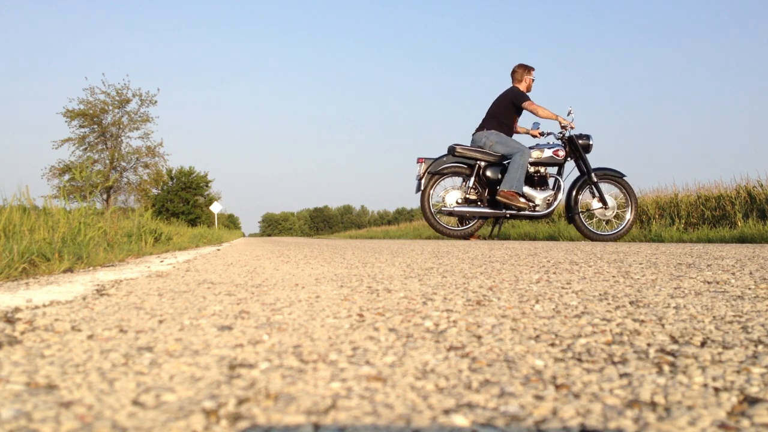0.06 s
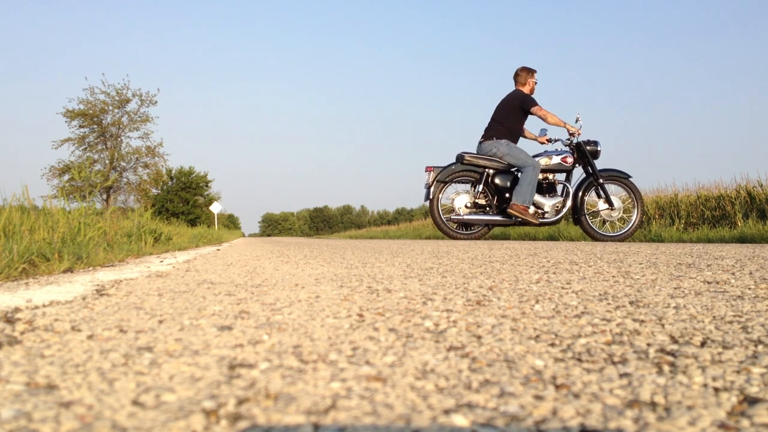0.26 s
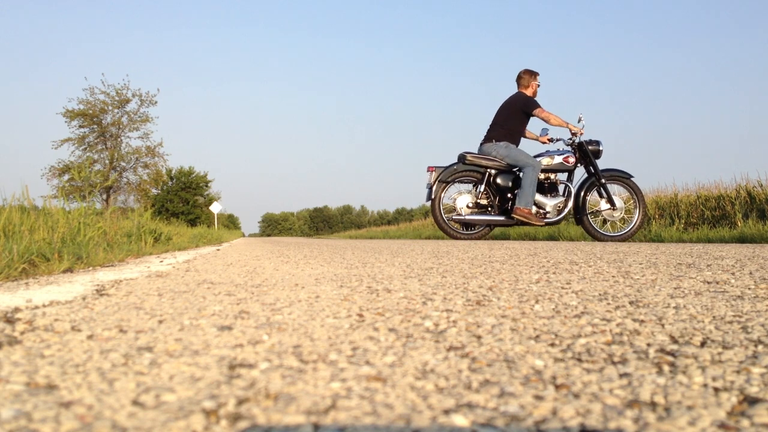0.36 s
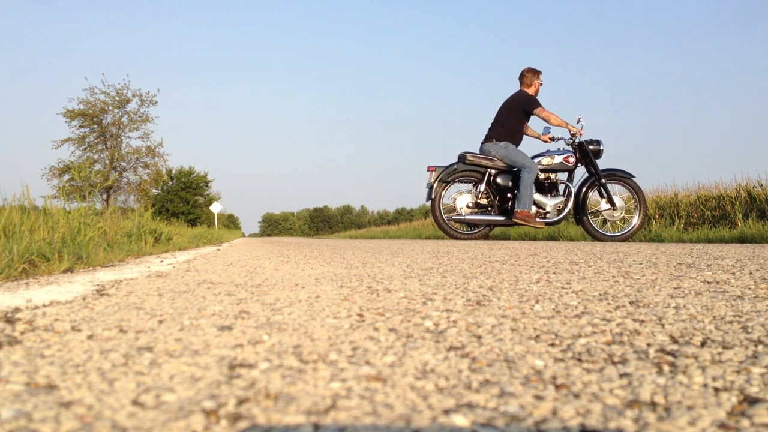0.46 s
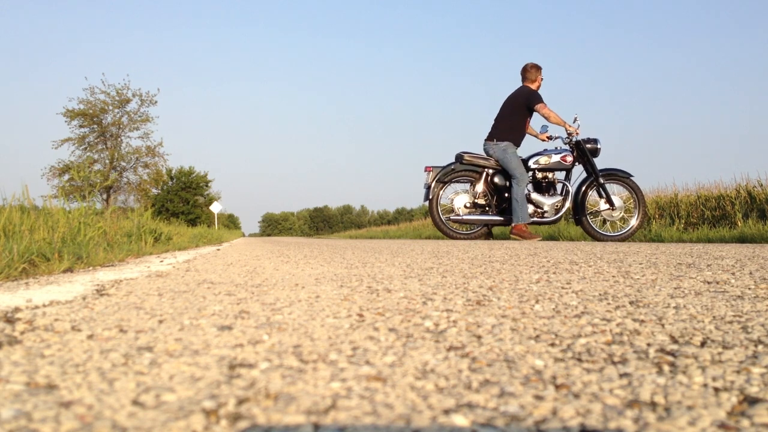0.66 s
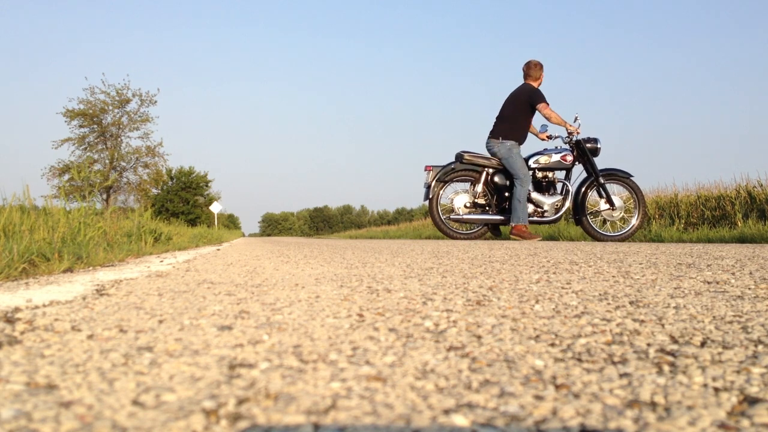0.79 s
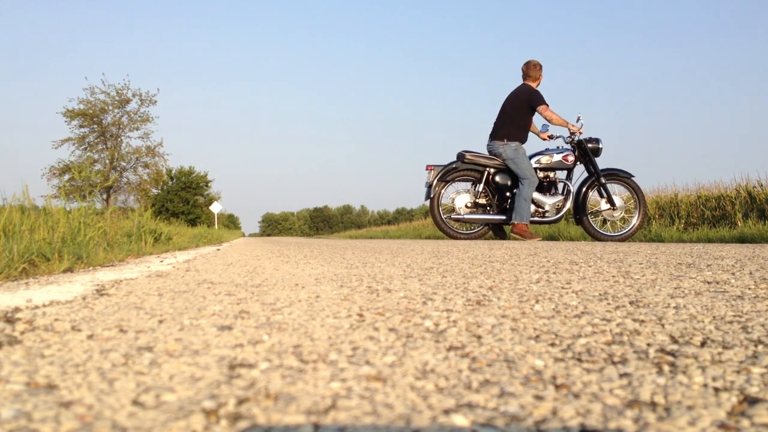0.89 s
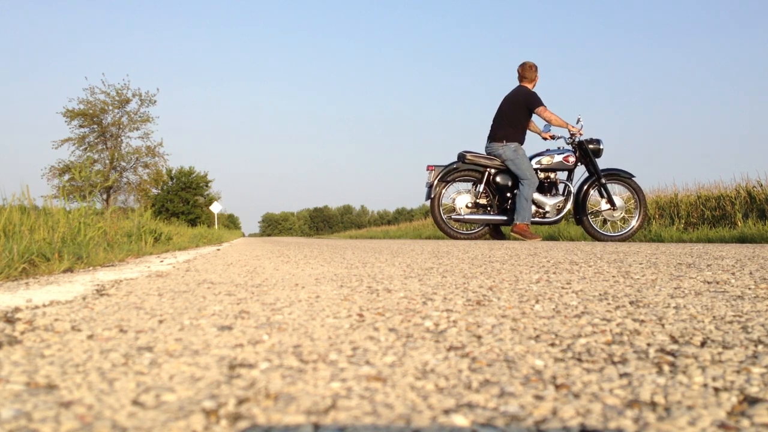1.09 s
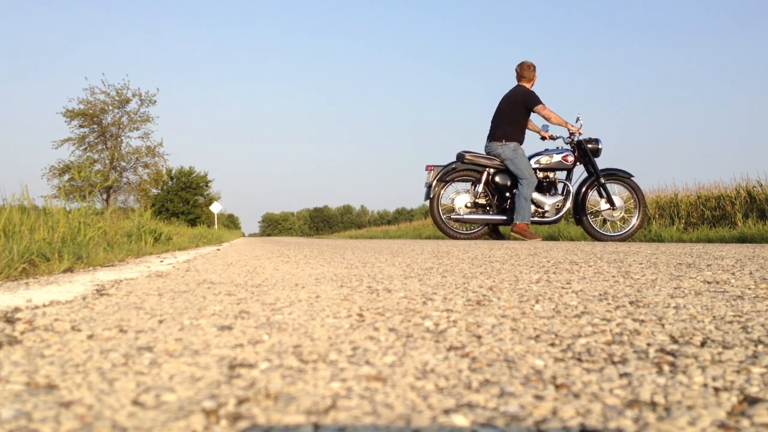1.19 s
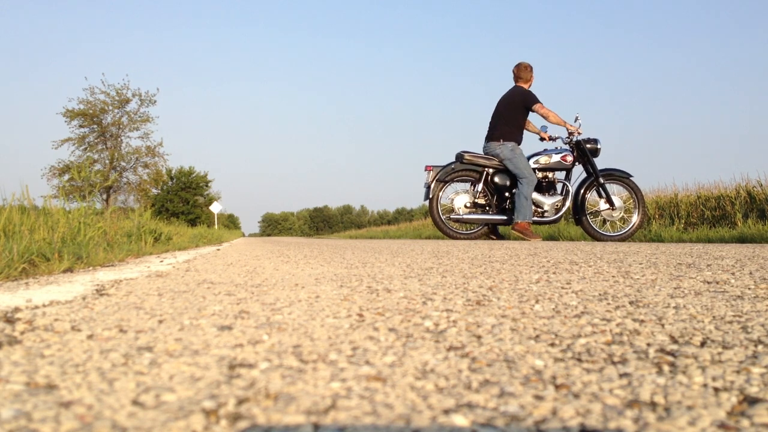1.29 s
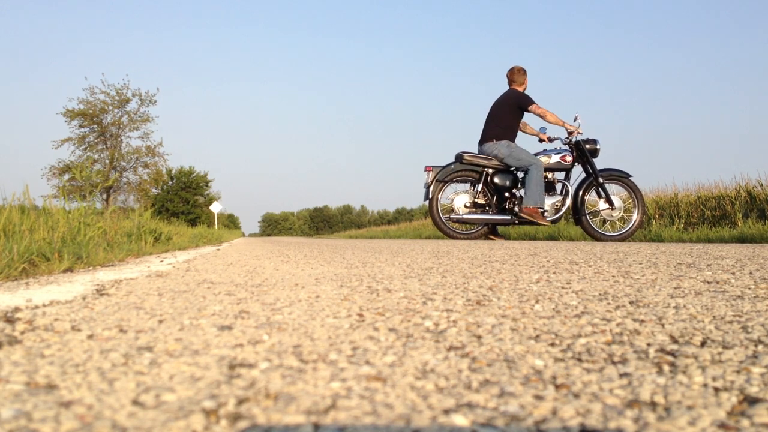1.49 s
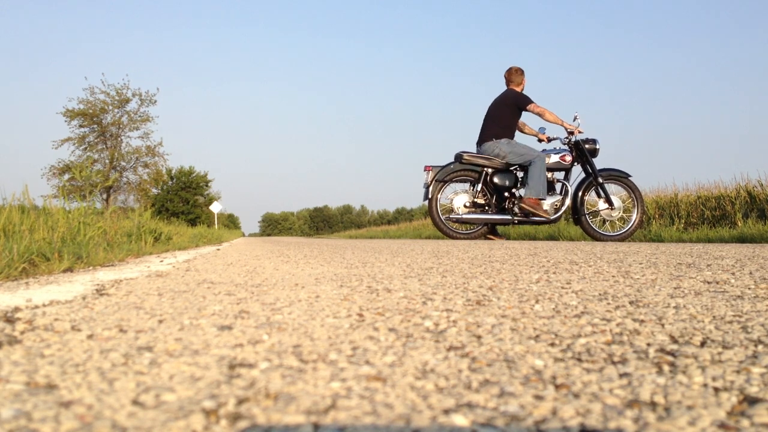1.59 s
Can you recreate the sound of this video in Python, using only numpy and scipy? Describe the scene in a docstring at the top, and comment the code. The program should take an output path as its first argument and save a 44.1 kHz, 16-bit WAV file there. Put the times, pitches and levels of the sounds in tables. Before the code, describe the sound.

One sharp, ringing clack sounds as a motorcycle's stand hits the frame, followed by a brief rattle and a smaller knock. The much quieter engine keeps ticking and puffing irregularly at idle on an open country road.

```python
"""On an open country road, a two-cylinder motorcycle idles unevenly and is rolled off its centre stand.
The stand scuffs the asphalt, springs up against the frame with a sharp clack, rattles and bounces once.
Each firing sends a soft puff through the exhaust pipes and makes them ring. Valves tick and gears
rustle in the engine, over a low murmur of outdoor air."""
import sys
import numpy as np
from scipy import signal
from scipy.fft import rfft, irfft, next_fast_len
from scipy.io import wavfile

SR = 44100
rng = np.random.default_rng(int(sys.argv[2]) if len(sys.argv) > 2 else 0)


def dump(signal):
    """Clip the signal to [-1, 1] and save it as 16-bit WAV at the path in sys.argv[1]."""
    limited = np.clip(np.atleast_2d(signal).T, -1, 1)
    pcm = np.round(limited * 32767).astype(np.int16)
    wavfile.write(sys.argv[1], SR, pcm)


N = 72765
TIME = np.arange(N) / SR

# Levels in tables are relative. A fade is the time a sound takes to fall by 60 dB.
# low outdoor air (frequency [Hz], level [dB])
AIR_TONE = [(25, -27), (50, -24), (95, -2.5), (200, 2), (400, -9.5), (620, -19), (3000, -43), (15000, -60)]

# how loud the rustle and ticking sound; they dip after the clack and slowly recover (time [s], level [dB])
HEARD_LEVEL = [(0, 3.5), (.15, 1.5), (.35, 1.5), (.52, -3.5), (.72, -2), (.9, -0.5), (1.3, 0.5), (1.65, 0)]
# rustle of gears and chain (frequency [Hz], level [dB])
RUSTLE_TONE = [(100, -20), (300, -3.5), (420, -1), (540, 0), (650, -10), (800, -1), (1500, -3.5),
               (2000, -5), (3100, -6.5), (4800, -8), (6300, -14.5), (8000, -16.5), (10000, -27),
               (15000, -35.5)]
# where the engine's metal case rings (frequency [Hz], width [Hz], level [dB])
CASE_RINGS = [(849, 270, -4), (1469, 58, -0.5), (1656, 92, -2), (2322, 120, -7.5), (3060, 190, -1),
              (3312, 39, -6), (3714, 53, -19)]
# two valve ticks in each engine cycle (time after the first cylinder fires [s], level [dB])
VALVE_TICKS = [(0.0125, 1), (0.0545, 3)]
# bright tick of a valve (frequency [Hz], level [dB])
TICK_TONE = [(300, -38), (1500, -1), (3200, 3.5), (6000, -2.5), (7400, -8), (8250, 4.5), (9100, -15.5),
             (15000, -32)]
# duller slap in the engine (frequency [Hz], level [dB])
SLAP_TONE = [(200, -48), (800, -8), (2000, -10.5), (3200, 6), (4800, 1.5), (7000, -10.5), (15000, -35.5)]
TURN_S, FIRST_FIRING_S = .0422, .0212  # one firing for each turn of the engine, two turns to a cycle
CYLINDER_DB = [0.5, -12.5]  # the cylinders take turns; the second is weak

# firings that catch harder or nearly miss (time [s], extra level [dB])
ODD_FIRINGS = [(.02, 8.5), (.15, 18.5), (.19, 7.5), (.27, -30), (.53, -3.5), (.57, 9), (.82, 16.5),
               (.87, 2), (1.04, 3), (1.08, 18.5), (1.12, 4), (1.2, 2.5), (1.29, -25), (1.33, 14),
               (1.37, 4.5), (1.5, 11), (1.54, 7)]
# ringing of the exhaust pipes (frequency [Hz], level [dB], fade [s])
PIPE_RINGS = [(115, -0.5, .22), (175, 4.5, .04), (232, -35, 0.019), (441.4, -8.5, 0.27), (535, -9.5, 0.12)]
# each pipe's puff (starting pitch [Hz], rise [Hz per s], fade [s])
PIPE_PUFFS = [(213.7, 4420, 0.28), (176, 3770, 0.23)]
# hiss spat out by hard firings (frequency [Hz], level [dB])
SPIT_TONE = [(300, -23), (1500, -7), (6000, -9), (11000, 2.5), (15000, -12)]

# how loud the stand's scrape on the road is (time [s], level [dB])
SCUFF_LEVEL = [(.16, -46.5), (.19, -38), (.21, -35), (.228, -38.5), (.27, -85)]
# dull sound of that scrape (frequency [Hz], level [dB])
SCUFF_TONE = [(60, -12), (150, 4), (300, 1.5), (600, 1), (1200, 1.5), (3000, -15), (7000, -14.5),
              (15000, -38)]

# the stand hits the frame (time [s], level [dB], dull above [Hz])
STAND_HITS = [(.2366, -11.5, 9000), (0.239, 3, 12200), (.2415, -3.5, 6000), (.2475, -6.5, 12000),
              (.2508, -9.5, 3000), (.257, -10.5, 10000), (.275, -12.5, 7500), (.284, -14.5, 4970),
              (.297, -24, 3970), (.3658, -14, 5600), (.3692, -18.5, 1410), (.377, -12.5, 1400),
              (.389, -21, 7200), (.396, -22, 6000), (.407, -26, 2000)]
# crack of steel on steel (frequency [Hz], level [dB])
CRACK_TONE = [(60, -40), (150, -23), (300, -2.5), (450, -15), (750, -8), (1100, -0.5), (1500, -1),
              (1900, -3), (3100, 3), (5200, -4), (7500, -7), (10500, -19), (15000, -21)]
# the bike's many small rings, blurred into a wash of noise (frequency [Hz], level [dB])
WASH_TONE = [(60, -40), (150, -8), (300, -8.5), (450, -1), (700, -1), (1100, -2.5), (1800, -2),
             (3100, -6.5), (5200, -4), (7500, -5.5), (10500, -15), (15000, -19)]
# how long that wash lasts (frequency [Hz], fade [s])
WASH_FADES = [(300, 0.57), (1200, .22), (4000, 0.16), (12000, 0.18)]
# ringing of stand and frame (frequency [Hz], level [dB], fade [s])
STAND_RINGS = [(242.5, -10, 0.13), (426.4, -6.5, 0.11), (556, 0, 0.18), (654.5, -1, .25), (681.3, -7, 0.23),
               (862, -13, 0.26), (897, -9.5, 0.28), (974, -5, 0.16), (1061, 1.5, 0.057), (1407, 0, 0.16),
               (2240, -3.5, 0.12), (2437, -11, 0.18), (2925, 0.5, 0.069), (3162, -3.5, 0.099),
               (3854, -2.5, 0.13), (4033, -6, 0.1), (5114, -2, 0.1), (5570, -10, 0.097), (6840, -11, 0.094)]
# hollow thud of a tyre as the bike bounces (frequency [Hz], level [dB], fade [s])
KNOCK_RINGS = [(405, -14, 0.22), (433.4, 3.5, 0.094), (650, -5, 0.056)]
BAND_EDGES_HZ = np.geomspace(60, 16000, 13)


def from_db(db):
    """Turn decibels into a number to multiply by."""
    return 10 ** (np.asarray(db) / 20)


def unit_level(x):
    """Scale a sound to an average strength (rms) of 1."""
    return x / np.sqrt(np.mean(x ** 2) + 1e-20)


def over_time(rows):
    """Join (time, value) points into a curve."""
    return np.interp(TIME, *np.transpose(rows))


def at_hz(rows, hz):
    """Read between (frequency, value) points, spaced as musical pitch."""
    frequencies, values = np.transpose(rows)
    return np.interp(np.log(hz), np.log(frequencies), values)


def noise(tone):
    """Noise of strength 1, shaped by a tone table."""
    size = next_fast_len(N, real=True)
    hz = np.maximum(np.arange(size // 2 + 1) * SR / size, 1)
    spectrum = rfft(rng.standard_normal(size)) * from_db(at_hz(tone, hz))
    return unit_level(irfft(spectrum, size)[:N])


def band(x, low, high):
    """Keep what lies between two frequencies."""
    return signal.sosfilt(signal.butter(2, [low, high], "band", fs=SR, output="sos"), x)


def cut_bass(x, hz, order):
    """Weaken what lies below a frequency."""
    return signal.sosfilt(signal.butter(order, hz, "high", fs=SR, output="sos"), x)


def band_noise(low, high):
    """Noise of strength 1 between two frequencies."""
    return unit_level(band(rng.standard_normal(N), low, high))


def noise_bands(tone):
    """Shaped noise split into bands, each unrelated to its neighbours."""
    pair = noise(tone), noise(tone)
    return [band(pair[k % 2], *edges) for k, edges in enumerate(zip(BAND_EDGES_HZ, BAND_EDGES_HZ[1:]))]


def clicks(times, levels_db):
    """One click at each time."""
    at = np.round(np.asarray(times) * SR).astype(int)
    inside = (at >= 0) & (at < N)
    return np.bincount(at[inside], from_db(levels_db)[inside], N) + 1e-18


def ring(x, hz, fade_s):
    """Each click starts a pure tone that dies away."""
    decay, angle = from_db(-60 / (fade_s * SR)), 2 * np.pi * hz / SR
    return signal.lfilter([0, np.sin(angle)], [1, -2 * decay * np.cos(angle), decay ** 2], x)


def bursts(times, levels_db, fade_s, rise_s=0.00048):
    """Loudness curve of blows whose energy rises quickly, adds up and dies away."""
    fall, rise = from_db(-120 / (fade_s * SR)), np.exp(-1 / (rise_s * SR))
    energy = signal.lfilter([1], [1, -fall], clicks(times, 2 * levels_db))  # twice the dB: squared
    return np.sqrt(signal.lfilter([1 - rise], [1, -rise], energy))


def air():
    """Outdoor air makes a low, steady murmur."""
    return from_db(-54) * noise(AIR_TONE)


def gears():
    """Gears and chain rustle inside the ringing engine case; the level flutters."""
    case = sum(from_db(-55 + db) * band_noise(hz - width / 2, hz + width / 2)
               for hz, width, db in CASE_RINGS)
    rustle = from_db(-45.5) * noise(RUSTLE_TONE) + case
    flutter_db = 1.84 * band_noise(3.3, 80)
    return rustle * from_db(flutter_db)


def engine():
    """Valves tick twice a cycle and a duller slap comes once, over the rustle of the gears."""
    cycles = np.arange(FIRST_FIRING_S, N / SR, 2 * TURN_S)
    ticks = sum(bursts(cycles + delay, db + rng.normal(0, 0.51, len(cycles)), fade_s=0.026)
                for delay, db in VALVE_TICKS)
    slaps = bursts(cycles + .0205, rng.normal(0, 0.83, len(cycles)), fade_s=.035)
    rustle = gears()
    clatter = from_db(-45) * ticks * noise(TICK_TONE) + from_db(-40) * slaps * noise(SLAP_TONE)
    return from_db(over_time(HEARD_LEVEL)) * (rustle + clatter)


def puff(start_hz, rise_hz_per_s, fade_s, rise_s=0.0011, length_s=0.034):
    """One short, rounded puff climbs in pitch as hot gas passes through the pipe."""
    t = TIME[TIME < length_s]
    swell = 1 - np.exp(-t / rise_s)
    fade = from_db(-60 * t / fade_s) * (1 - (t / length_s) ** 4)  # closes early, at length_s
    return swell * fade * np.sin(2 * np.pi * (start_hz + rise_hz_per_s * t / 2) * t)


def exhaust(drone_hz=118.5):
    """Uneven firings puff and spit from two pipes and ring them; the lowest ring drones on between."""
    times = np.arange(FIRST_FIRING_S, N / SR, TURN_S)
    firing_db = np.resize(CYLINDER_DB, len(times)) - rng.normal(0, 0.4, len(times))
    for when, extra_db in ODD_FIRINGS:
        firing_db[np.argmin(abs(times - when))] += extra_db
    pipes = sum(ring(clicks(times, -45.5 + firing_db + db), hz, fade_s) for hz, db, fade_s in PIPE_RINGS)
    for k, pipe in enumerate(PIPE_PUFFS):
        firings = clicks(times[k::2], -42 + firing_db[k::2])
        pipes += signal.fftconvolve(firings, puff(*pipe))[:N]
    drone = from_db(-51) * np.sin(2 * np.pi * drone_hz * (TIME - FIRST_FIRING_S))
    spit = bursts(times, -59.5 + firing_db, fade_s=0.023) * noise(SPIT_TONE)
    return cut_bass(pipes + drone + spit, hz=85, order=4)


def scuff():
    """The stand's feet scrape briefly as they leave the road."""
    return from_db(over_time(SCUFF_LEVEL)) * noise(SCUFF_TONE)


def stand(knock_at_s=.3685):
    """Each hit of steel on steel cracks and sets the bike ringing; a tyre adds a hollow thud during the bounce."""
    times, hit_db, dull_above_hz = np.transpose(STAND_HITS)

    def strength_db(hz):
        """Level of each hit at one frequency; soft hits are duller."""
        return hit_db - 10 * np.log10(1 + (hz / dull_above_hz) ** 4)

    clack = np.zeros(N)
    centres_hz = np.sqrt(BAND_EDGES_HZ[1:] * BAND_EDGES_HZ[:-1])
    for hz, crack, wash in zip(centres_hz, noise_bands(CRACK_TONE), noise_bands(WASH_TONE)):
        clack += from_db(-10.5) * crack * bursts(times, strength_db(hz), fade_s=0.025)
        clack += from_db(-21.5) * wash * bursts(times, strength_db(hz), at_hz(WASH_FADES, hz))
    for k, (hz, db, fade_s) in enumerate(STAND_RINGS):
        hits = clicks(times, -25 + db + strength_db(hz) + rng.normal(0, 1, len(times)))
        clack += (-1) ** k * ring(hits, hz, fade_s)  # neighbouring rings start opposite ways
    for hz, db, fade_s in KNOCK_RINGS:
        clack += ring(clicks([knock_at_s], [-26.5 + db]), hz, fade_s)
    return cut_bass(clack, hz=210, order=2)


def scene():
    """The bike and the open air, added into one channel."""
    return (stand() + scuff() + exhaust() + engine() + air())[None]


def record(dry, cutoff_hz=15300):
    """Cut away the very highest treble."""
    return signal.sosfilt(signal.ellip(10, .1, 70, cutoff_hz, fs=SR, output="sos"), dry)


dry = scene()
out = record(dry)
dump(out)
```